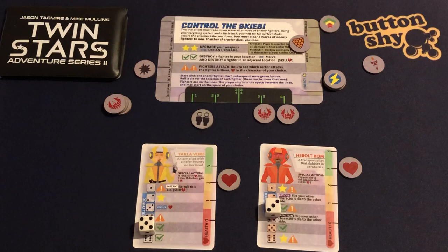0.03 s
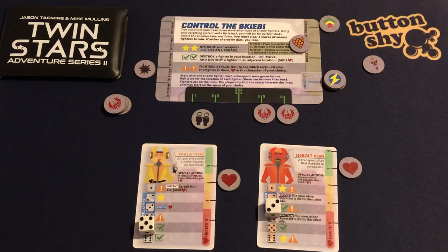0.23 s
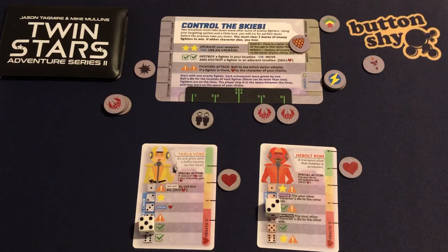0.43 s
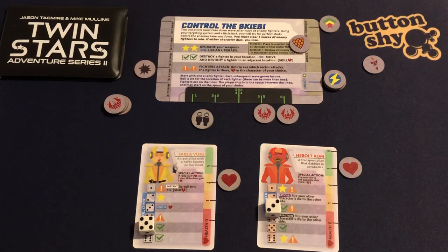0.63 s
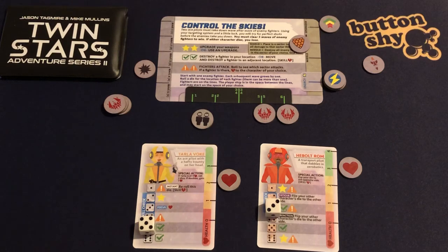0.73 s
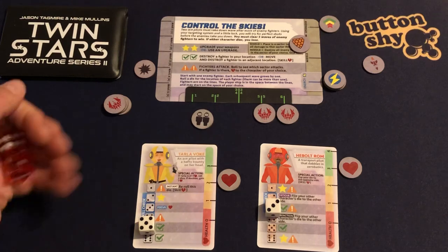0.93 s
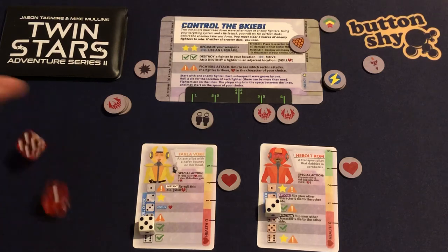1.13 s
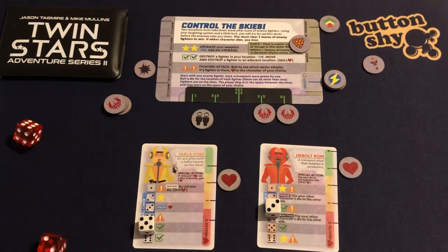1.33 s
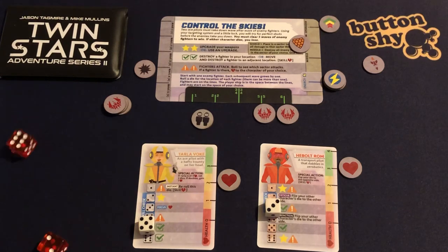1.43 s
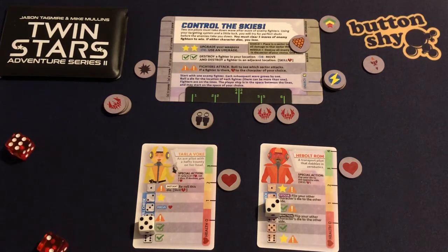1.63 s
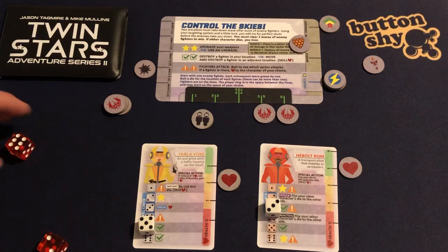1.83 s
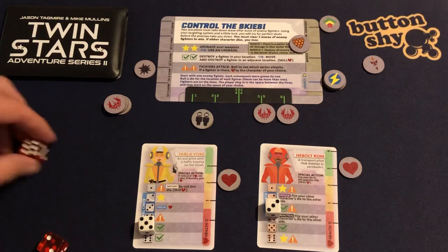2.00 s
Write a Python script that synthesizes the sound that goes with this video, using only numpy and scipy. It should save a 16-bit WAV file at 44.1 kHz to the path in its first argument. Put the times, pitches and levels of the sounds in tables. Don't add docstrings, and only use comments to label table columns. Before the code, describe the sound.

Close up in a small quiet room, hard dice click and rattle inside a palm with faint sleeve rustle, then are thrown, bouncing in muffled taps that make the tabletop ring before settling.

```python
import sys
import numpy as np
from scipy import signal
from scipy.fft import rfft, irfft
from scipy.io import wavfile
from scipy.ndimage import uniform_filter1d

SR = 44100
rng = np.random.default_rng(int(sys.argv[2]) if len(sys.argv) > 2 else 0)


def volts_from_decibels(level):
    exponent = np.asarray(level, float) / 20
    return 10 ** exponent


def log_audio(samples):
    frames = np.atleast_2d(samples).T
    limited = np.clip(frames, -1, 1)
    pcm = np.round(limited * 32767).astype(np.int16)
    wavfile.write(sys.argv[1], SR, pcm)


N = 90978


def evened(x):
    return x / np.sqrt(np.mean(x ** 2) + 1e-20)


def read(points, hz):
    f, value = np.transpose(points)
    return np.interp(np.log(hz + 1), np.log(f + 1), value)


def add(mix, s, sound):
    part = mix[round(s * SR):][:len(sound)]
    part += sound[:len(part)]


def noise(spectrum):
    bins = rfft(rng.standard_normal(N))
    return evened(irfft(bins * volts_from_decibels(read(spectrum, np.fft.rfftfreq(N, 1 / SR))), N))


def ring(hz, t60, db, rise_s=0.000119):
    t = np.arange(int(1.3 * t60 * SR) + 60) / SR
    rise = (1 - np.exp(-t / rise_s)) ** 2
    return volts_from_decibels(db - 60 * t / t60) * rise * np.sin(2 * np.pi * hz * t)


def tail(x, decay, tone, db, gap_s):
    spacing = 14
    slots = np.arange(int(gap_s * SR), SR - 20, spacing)
    taps = np.zeros(SR)
    taps[slots + rng.integers(0, spacing, len(slots))] = rng.choice([-1., 1.], len(slots))
    taps *= np.minimum(np.arange(SR) / SR / (1.79 * gap_s), 1) ** 2
    hz, t, z = signal.stft(taps, SR, nperseg=256)
    z = z * volts_from_decibels(read(tone, hz)[:, None] - 60 * t / read(decay, hz)[:, None])
    echo = signal.istft(z, SR, nperseg=256)[1]
    return volts_from_decibels(db) * signal.fftconvolve(x, echo / np.linalg.norm(echo))[:N]


# (frequency [Hz], level [dB per Hz])
HISS_SPECTRUM = [(35, -54.5), (60, -10), (124, 0.5), (274, -8.5), (323, -11), (515, -26), (1380, -26),
                 (1620, -23), (15500, -32.5)]


def hiss():
    return volts_from_decibels(-70) * noise(HISS_SPECTRUM)


# (frequency [Hz], level [dB])
GUST_SPECTRUM = [(8, 5), (25, -11.5), (50, -8.5), (90, -15.5), (200, -43), (1000, -69)]
# (frequency [Hz], level [dB])
SLEEVE_SPECTRUM = [(60, -0.5), (200, 0), (800, -3), (1500, -12), (5000, -29), (12000, -31)]
# (time [s], level [dB])
SLEEVE_MOTION = [
    (0, -2.5),
    (.1, 1.5),
    (.15, 8.5),
    (.3, 10),
    (.45, 2),
    (.6, -9),
    (1.1, 1),
    (1.5, -6.5),
    (2.06, -3.5),
]
# (frequency [Hz], level [dB])
BRUSH_SPECTRUM = [(500, -6), (3000, 0.5), (8000, -3), (14000, -6)]
# (time [s], level [dB], swing [Hz])
AIR_PUFFS = [(0.106, -36.5, 42.6), (0.257, -34.5, 14.68), (0.328, -44, 18.26), (0.458, -46, 14.7),
             (0.599, -41.5, 17.65), (0.713, -44, 20.3), (0.842, -47, 12.75), (1.002, -53.5, 22.3),
             (1.433, -66, 10.4), (1.752, -56, 42.5), (1.947, -63, 32)]


def hand_air():
    t = np.arange(N) / SR
    puffs = np.zeros(N)
    for s, db, hz in AIR_PUFFS:
        swell = np.exp(-(1.212 * hz * (t - s)) ** 2)
        puffs += volts_from_decibels(db) * np.sin(2 * np.pi * hz * (t - s)) * swell
    lumps = volts_from_decibels(2.0 * evened(uniform_filter1d(rng.standard_normal(N), size=500)))
    rustle = volts_from_decibels(-69 + np.interp(t, *np.transpose(SLEEVE_MOTION))) * noise(SLEEVE_SPECTRUM)
    reach = np.clip((t - 1.891) / 0.088, 0, 1)
    brush = volts_from_decibels(-75.5) * reach * noise(BRUSH_SPECTRUM)
    return puffs + volts_from_decibels(-58.5) * noise(GUST_SPECTRUM) + lumps * (rustle + brush)


# (time [s], palm thud [dB],
# cupping re palm # [dB], die-on-die clack [dB], edge sharpness re clack [dB])
DICE_KNOCKS = [(0.0024, -43.5, -0.5, -45, 0.5), (0.0102, -50, 8.5, -38.5, -9.5),
               (0.012, -42.5, -9, -34, -0.5), (0.0203, -47, -13, -35, -10.5), (0.0253, -48, -1.5, -32.5, 1),
               (0.0617, -55.5, -4.5, -56, -38), (0.0927, -64.5, -0.5, -59, -22.5),
               (0.143, -48, -28, -58.5, 12.5), (0.2048, -69, 5, -66, 22), (0.2086, -35, 3.5, -23.5, 0.5),
               (0.2524, -29, -2, -26, -3.5), (0.2585, -35.5, -1.5, -29.5, -7.5), (0.2632, -28, 0, -27.5, 8),
               (0.2903, -32.5, 4.5, -19, 1.5), (0.3013, -39, 2, -37.5, -7.5),
               (0.3163, -46, 0.5, -31.5, 11.5), (0.3192, -45.5, 4.5, -28, -3.5),
               (0.327, -68.5, 15, -33, -17.5),
               (0.385, -44.5, -1.5, -41.5, -18.5), (0.3928, -40, -2.5, -39.5, -9.5),
                (0.4006, -46, 1, -58.5, -11), (0.4079, -41.5, 1, -43, -12.5),
                (0.413, -44.5, -2.5, -68.5, -8), (0.4411, -56, 6.5, -71.5, -13),
                (0.4628, -62.5, 12, -36.5, -6.5), (0.4829, -72, 12.5, -42.5, -7),
                (0.5112, -68, -11.5, -84.5, -10.5), (0.5249, -28.5, 7, -20, 2.5),
                (0.5896, -25.5, -0.5, -29.5, 1.5), (0.5972, -28.5, 0.5, -43.5, -0.5),
                (0.61, -48.5, -1, -51.5, -7.5), (0.621, -44, -3, -49, -4.5), (0.631, -46.5, 0.5, -50, -13),
                (0.6489, -31.5, 1.5, -37, 11), (0.6564, -39, 0, -38.5, -11),
                (0.6873, -29, -0.5, -36.5, 0.5),
               (0.6971, -29, 0.5, -38.5, -16), (0.704, -31.5, -0.5, -33, -19),
                         (0.7161, -38, 0.5, -45, -8.5), (0.7253, -37.5, 1, -42.5, -8),
                         (0.731, -40.5, -6, -41, 5), (0.7414, -29, -10.5, -32, 10),
                         (0.7497, -52.5, -1.5, -39.5, -16), (0.7582, -43.5, -6, -40, -15),
                         (0.768, -34.5, 0, -22.5, 4), (0.8249, -38.5, -9.5, -36.5, -7.5),
                         (0.8386, -47, -3, -57.5, -6.5), (1.0153, -53, -9.5, -35, 0),
                         (1.0378, -58, -13.5, -41, 0), (1.0473, -57.5, -7, -42, 6),
                         (1.114, -38.5, -5.5, -31, -9.5), (1.1384, -52, -9.5, -42, 1)]
# (time [s], cup [Hz], die [Hz], edge [Hz])
GRIP_PITCHES = [(0.2093, 4395, 5518, 7200), (0.253, 4050, 6100, 7400), (0.2632, 4724, 5910, 7250),
                (0.2903, 3867, 6200, 8200), (0.3168, 3710, 6110, 7800), (0.4826, 4120, 5170, 9500),
                (0.5248, 4086, 6424, 7400), (0.5896, 4065, 5510, 7200), (0.6488, 4100, 4980, 7300),
                (0.6873, 4056, 5470, 7600), (0.6968, 4160, 5200, 7570), (0.7414, 4740, 5690, 7800),
                (0.768, 4724, 6270, 8240), (1.0153, 4900, 6430, 7840), (1.114, 4464, 6198, 8160),
                (1.1383, 4150, 5150, 6500)]
# (time [s], level [dB], pitch [Hz])
CORNER_SNAPS = [(.0252, -52.5, 12100), (.0928, -61, 13000), (.143, -52, 11000), (0.2103, -46, 10600),
                (.253, -52, 12400), (.2632, -44.5, 11900), (0.2913, -36.5, 12300), (0.3164, -39, 12200),
                (0.3198, -45.5, 12400), (.4826, -71.5, 13100), (.5896, -53, 12700), (0.5986, -59.5, 12400),
                (0.65, -58, 13000), (.6566, -61, 12500), (.6968, -55.5, 12500), (.7375, -56.5, 10500),
                (.7414, -56.5, 12600), (0.825, -56.5, 11500), (.768, -46.5, 13100), (1.0133, -50, 11600),
                (1.0378, -50.5, 11900), (1.114, -56, 12300)]


def knocks():
    mode_hz = np.array([2316, 3957, 5970, 7970])
    mode_t60 = [0.003106, 0.004005, 0.00259, 0.001169]  # seconds, same order
    stagger_s = 0.0001605
    rebound_s, rebound_db = 0.00066, -13.5
    late_s, late_db = 0.0015, -15.5
    wall_s, wall_db = 0.0085, -28
    near, far = np.zeros(N), np.zeros(N)
    rows = DICE_KNOCKS
    for (s, palm, cup, die, edge), z in zip(rows, rng.standard_normal((len(rows), 10))):
        pitch = mode_hz * (1 + 0.03 * z[:4])
        for grip in GRIP_PITCHES:
            if abs(grip[0] - s) < 0.003:
                pitch = [pitch[0], *grip[1:]]
        for k, db in enumerate([palm, palm + cup, die, die + edge]):
            tone = (-1) ** k * ring(pitch[k], mode_t60[k], db + 7.5, 0.0001501)
            add(near, s - 0.0003 + stagger_s * (k // 2), tone)
            add(near, s + late_s * (1 + 0.11 * z[9]), volts_from_decibels(late_db + 2 * z[7 - k]) * tone)
            add(near, s + rebound_s * (1 + 0.39 * abs(z[8])), volts_from_decibels(rebound_db + 2 * z[4 + k]) * tone)
            add(near, s + wall_s, volts_from_decibels(wall_db) * tone)
            add(far, s, ring(pitch[k], 0.3203 * mode_t60[k], db + 17, 0.00008))
        add(far, s, ring(8870, 0.000743, die + 0.5 * edge - 1, 0.00006))
    for s, db, hz in CORNER_SNAPS:
        add(near, s, ring(hz, 0.000505, db + 20.5, 0.00006))
        add(far, s, ring(hz, 0.0011, db + 14, 0.00006))
    return near, far


# (frequency [Hz], t60 [s])
ROOM_DECAY = [(200, 0.21), (1000, 0.15), (2500, 0.671), (5500, 0.519), (9000, 0.49), (14000, 0.59)]
# (frequency [Hz], level [dB])
ROOM_COLOUR = [(200, -0.5), (1000, -1), (2300, 3), (3500, -4), (5500, 5.5), (7300, 0.5), (10000, -4.5),
               (14000, -9)]


def room(source):
    return tail(source, ROOM_DECAY, ROOM_COLOUR, db=-15, gap_s=0.0035)


# (time [s], length [s], level [dB], centre [Hz])
SKIN_SLIDES = [
    (0.029, 0.0096, -49.5, 5900),
    (0.0753, 0.0131, -49, 6000),
    (0.15, 0.0147, -51, 5050),
    (0.154, 0.0032, -63, 6000),
    (0.1638, 0.018, -53, 4100),
    (.32, 0.0067, -44, 6400),
    (0.328, 0.021, -54, 5660),
    (0.4266, 0.0125, -45.5, 4020),
    (0.442, 0.0104, -67, 3500),
    (1.034, 0.0188, -61, 6200),
]


def slides():
    out = np.zeros(N)
    for s, length, db, hz in SKIN_SLIDES:
        t = np.arange(0, 0.63 * length, 1 / SR)
        unevenness = uniform_filter1d(rng.standard_normal(len(t)), size=9)
        grit = rng.standard_normal(len(t)) * volts_from_decibels(4.7 * unevenness)
        body = ring(hz, 0.0017, 0)[:150]
        body = body + 0.5 * ring(2908, 0.00203, 0)[:150]
        body = body + 0.692 * ring(1.3 * hz, 0.0016, 0)[:150]
        fade = volts_from_decibels(db - 43.6 * (t / length) ** 2)
        add(out, s, fade * evened(np.convolve(grit, body)[:len(t)]))
    return out


# (time [s], table thump [dB], tap [dB], tap pitch [Hz])
LANDINGS = [(1.1142, -31, -31.5, 2290), (1.1252, -51, -33.5, 2288), (1.146, -36.5, -63.5, 2200),
            (1.1615, -36, -57, 2200), (1.188, -60, -70.5, 2020), (1.1543, -40.5, -35, 2120),
            (1.2018, -36.5, -41, 1975), (1.2056, -60.5, -42, 2402), (1.232, -37.5, -36.5, 1942),
            (1.2405, -49, -45.5, 2300), (1.2615, -39.5, -47.5, 1340), (1.296, -45.5, -58, 2270),
            (1.326, -47.5, -55.5, 2190), (1.4949, -42.5, -38, 1231), (1.516, -46, -51, 1120),
            (1.5286, -45, -64, 1000)]
# (frequency [Hz], level [dB], t60 [s])
TABLE_MODES = [(136.45, -11, 0.88), (205.9, -2.5, 0.273), (228.3, -0.5, 0.325), (263.66, 3.5, 0.357),
               (290.9, 4, 0.201), (350.65, 10.5, 0.14), (382.7, -12, 0.26), (453, -34.5, 0.12),
               (484.7, -11.5, 0.14), (511.9, -6, 0.447), (578, -33.5, 0.37), (748, -26, 0.09),
               (899, -19, 0.37)]
# (frequency [Hz], t60 [s])
BOARD_DECAY = [(100, 0.28), (300, 0.375), (900, 0.523), (2200, 0.414), (5000, 0.598)]
# (frequency [Hz], level [dB])
BOARD_COLOUR = [(100, -1), (300, -1.5), (800, -1.5), (1500, -10.5), (2500, -10.5), (5000, -6.5)]


def tumble():
    tap_t60 = 0.004386
    blows, rings = np.zeros(N), np.zeros(N)
    for (s, thump, tap, hz), z in zip(LANDINGS, rng.standard_normal((len(LANDINGS), len(TABLE_MODES)))):
        add(blows, s, -ring(hz, tap_t60, tap + 4, 0.0001414))
        add(blows, s + 0.001069, ring(1.204 * hz, tap_t60, tap - 9, 0.000366))
        add(blows, s + 0.001831, ring(hz, 1.68 * tap_t60, tap - 8, 0.000163))
        add(blows, s + 0.001326, ring(344.8, 0.00958, thump + 3, 0.000189))
        for (f, db, t60), v in zip(TABLE_MODES, z):
            add(rings, s + 0.001147, ring(f, 0.565 * t60, thump + db - 13.5 + 3 * v, 0.00185))
    return blows + rings + tail(blows, BOARD_DECAY, BOARD_COLOUR, db=-2, gap_s=0.004143)


def scene():
    floor = hiss() + hand_air()
    near, far = knocks()
    scrape = slides()
    return (floor + near + scrape + room(far + scrape) + tumble())[None]


def top_cut(x):
    return signal.sosfilt(signal.butter(12, 16480, fs=SR, output="sos"), x)


def record(dry):
    roll_off = signal.firwin(numtaps=61, cutoff=15900, fs=SR)
    mix = signal.oaconvolve(dry, roll_off[None], "same")
    return top_cut(mix)


dry = scene()
out = record(dry)
log_audio(out)
```